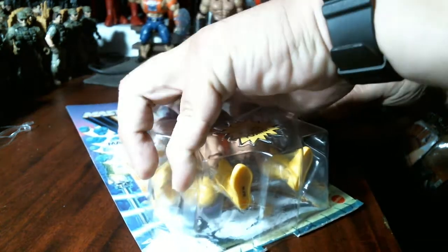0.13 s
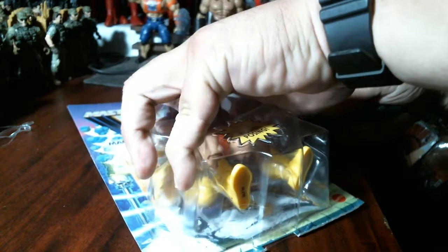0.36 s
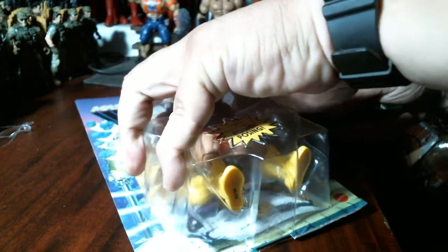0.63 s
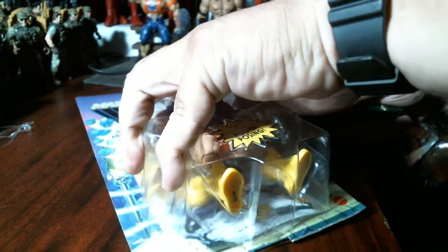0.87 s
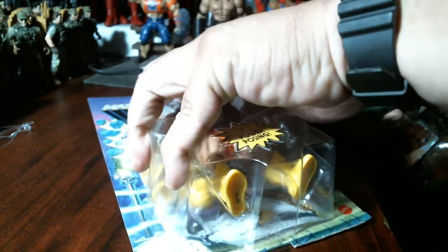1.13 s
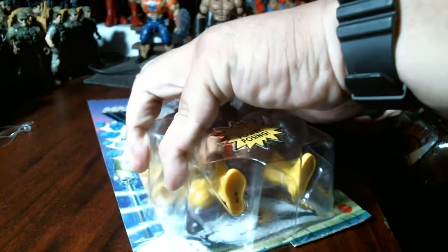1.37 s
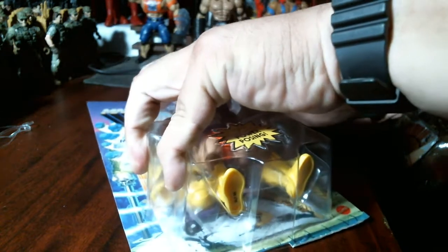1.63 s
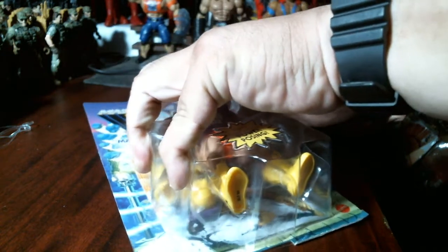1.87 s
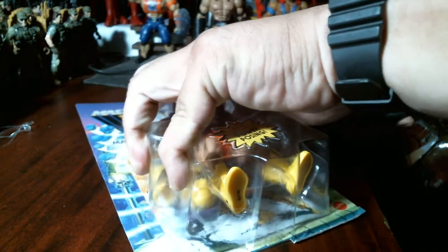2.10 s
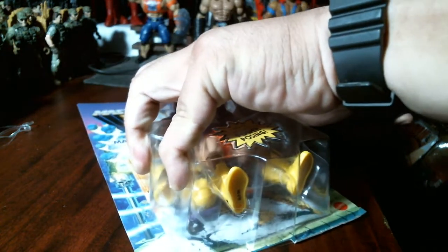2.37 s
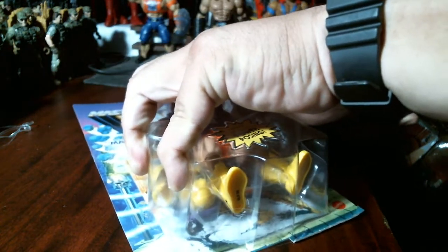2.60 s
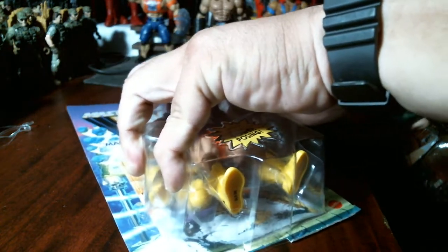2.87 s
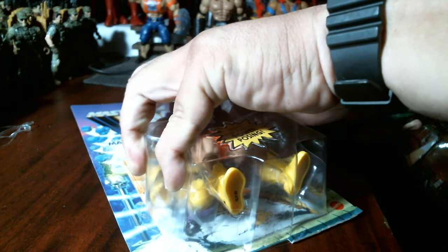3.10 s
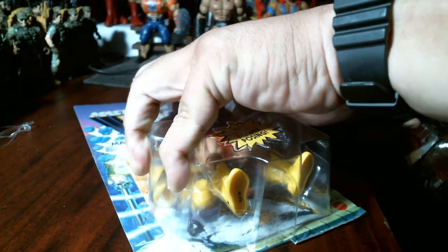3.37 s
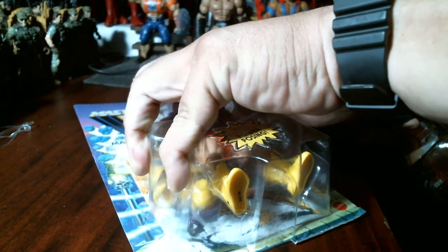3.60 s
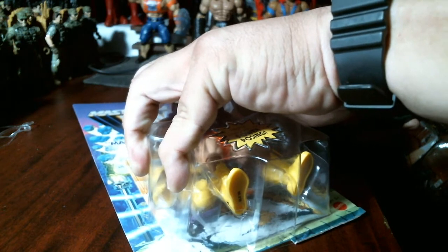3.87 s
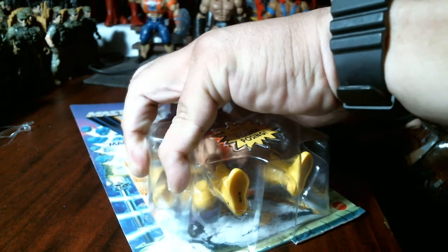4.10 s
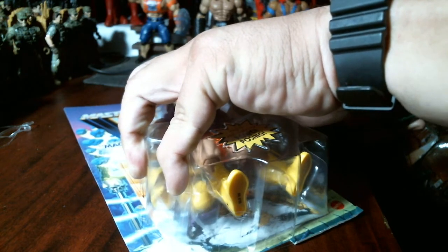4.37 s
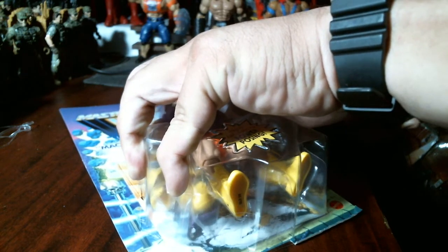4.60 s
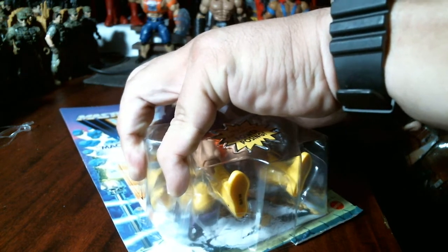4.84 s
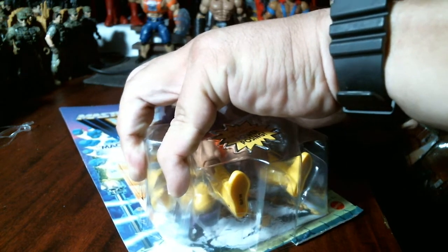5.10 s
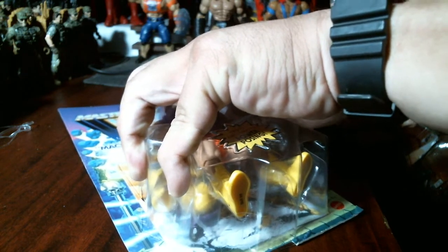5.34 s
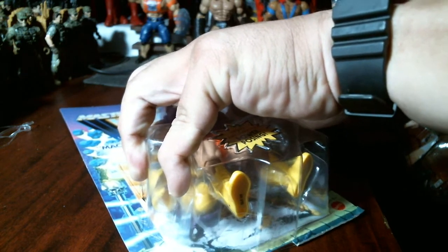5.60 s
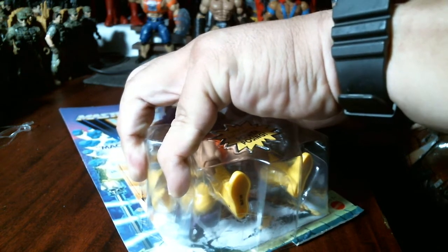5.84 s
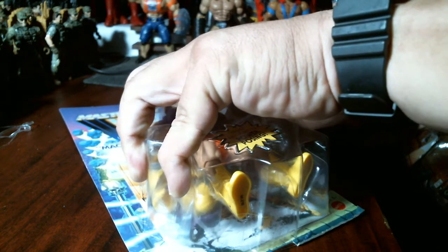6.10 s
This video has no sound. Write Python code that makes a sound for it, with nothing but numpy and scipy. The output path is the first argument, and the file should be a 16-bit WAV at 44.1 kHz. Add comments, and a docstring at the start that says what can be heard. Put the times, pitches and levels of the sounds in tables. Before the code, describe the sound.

Stiff clear plastic packaging cracks, pops and crackles irregularly as a blade stabs and saws it on a wooden table indoors.

```python
"""A blade stabs and saws along a stiff plastic shell glued to a card, held down by a hand on a wooden table.
From the start a quiet room hums (filtered noise and tones), strokes rasp and the squeezed wall creaks (gritty noise).
Within a tenth of a second short low pops and dull knocks join (swelling, dying sines), and the wall begins to
crack and buckle (noise snaps with damped modes). Before one second the blade rings once (damped steel modes);
the other sounds go on irregularly to the end."""
import sys
import numpy as np
from scipy import signal
from scipy.fft import rfft, irfft
from scipy.io import wavfile
from scipy.ndimage import uniform_filter1d

SR = 44100
rng = np.random.default_rng(int(sys.argv[2]) if len(sys.argv) > 2 else 0)


def rack_gain(trim_db):
    """Turn a fader trim in dB into the linear factor to multiply a signal by."""
    fader = np.asarray(trim_db, float)
    return 10 ** (fader / 20)


def master_out(mix):
    """Clip the mix to full scale and print it as 16-bit PCM to the path in sys.argv[1]."""
    frames = np.transpose(np.atleast_2d(mix))
    ceiling = np.clip(frames, -1, 1)
    pcm = np.round(ceiling * 32767).astype(np.int16)
    wavfile.write(sys.argv[1], SR, pcm)


N = 274302  # length in samples

# Three ranges in which the wall radiates, as filter responses: f/Hz, level/dB
WALL_LOW = [(500, -21.5), (900, -1.5), (2200, -1.5), (3000, -18.5), (6000, -56.5)]
WALL_MIDDLE = [(1500, -49), (2700, 0), (4100, 2.5), (6000, -4.5), (7500, -20.5), (12000, -54.5)]
WALL_HIGH = [(4500, -26.5), (7000, 6), (10000, 4.5), (12500, -6.5), (16500, -34)]


def evened(x):
    """Normalizes the mean power: rms 1."""
    return x / np.sqrt(np.mean(x ** 2) + 1e-20)


def peaked(x):
    """Normalizes the largest excursion: peak 1."""
    return x / (abs(x).max() + 1e-20)


def colour(x, points):
    """Linear filtering in the frequency domain: (Hz, dB) points joined on a log-frequency axis."""
    f, level_db = np.transpose(points)
    hz = np.fft.rfftfreq(len(x), 1 / SR)
    gain_db = np.interp(np.log(hz + 1), np.log(f + 1), level_db)
    return irfft(rfft(x) * rack_gain(gain_db), len(x))


def add(mix, s, sound):
    """Superposition: mixes a sound in at time s, cut at the end of the mix."""
    part = mix[max(round(s * SR), 0):][:len(sound)]
    part += sound[:len(part)]


def scattered(per_s):
    """Independent random moments, each with a size from -8 to 0 dB and a spare share 0-1."""
    count = round(per_s * N / SR)
    return rng.random((count, 3)) * [N / SR, -8, 1]


def ring(modes, t, spread_db, detune):
    """Modal decay: a sum of dying sines; each blow lands elsewhere, so weights and pitches vary."""
    hz, db, t60 = np.transpose(modes)[:, :, None]
    luck = rng.standard_normal((3, len(modes), 1))
    level = rack_gain(db + spread_db * luck[0] - 60 * t / t60)
    phase = 2 * np.pi * hz * (1 + detune * luck[1]) * t + luck[2] / 2
    return (level * np.sin(phase)).sum(0)


def gritty(length, per_s, size_db, ranges, calm_s=0.):
    """Stick-slip: uneven micro-slips modulate noise; random spectral bumps make every spot of the wall differ."""
    sizes = rack_gain(size_db * np.minimum(rng.exponential(1, length), 5))
    slips = sizes * (rng.random(length) < per_s / SR)
    slips *= np.arange(length) >= calm_s * SR  # no slips before calm_s
    rattle_s = .0005  # time constant of each slip
    force = signal.lfilter([1], [1, -np.exp(-1 / (rattle_s * SR))], slips) + .6  # over a steady friction floor
    bumps_db = [(hz, 4.0 * rng.standard_normal()) for hz in np.geomspace(500, 16000, num=48)]
    noise = colour(force * rng.standard_normal(length), bumps_db)
    return [colour(noise, band) for band in ranges]


def push(length):
    """Amplitude envelope of the hand force over a stroke of length s: bites in quickly, fades more slowly."""
    progress = np.clip(np.arange(8192) / SR / length, 0, 1)
    return np.sin(np.pi * progress ** 0.72) ** 1.32


def room_tone():
    """Stationary background: patchy filtered noise with the steady and narrow-band lines of a distant fan."""
    # Spectrum of the air noise before its rms is set: f/Hz, level/dB
    air = [(18, -27), (45, -30), (70, -18.5), (100, -8), (217, 8), (399, -9.5), (480, 9), (562, 1),
           (881, -7), (1450, -10.5), (2280, -19), (3210, -21.5), (8000, -35), (16500, -37.5)]
    # Steady fan tones: f/Hz, rms level/dB
    fan_lines = [(86, -65), (119.5, -65)]
    # Fuzzy hum lines: f/Hz, half-power width/Hz, rms level/dB
    hum = [(184.3, 11, -72), (238.5, 5.2, -59.5), (327.4, 17, -63), (497, 5.4, -70)]
    air_db = -55.5  # rms
    frames = N // 256 + 5
    a, b, patches = rng.standard_normal((frames, 513, 3)).T
    patches = uniform_filter1d(uniform_filter1d(patches, 10, 0), 8, 1)  # smooth over frequency, then time
    patches_db = 2.0 * evened(patches)
    patchy = signal.istft((a + 1j * b) * rack_gain(patches_db), nperseg=1024, noverlap=768)[1][:N]
    out = rack_gain(air_db) * evened(colour(patchy, air))
    t = np.arange(N) / SR
    for line_hz, db in fan_lines:
        out += rack_gain(db) * evened(np.sin(2 * np.pi * (line_hz * t + rng.random())))
    for line_hz, width, db in hum:
        r = np.exp(-np.pi * width / SR)  # pole radius
        drive = rng.standard_normal(N) + 1j * rng.standard_normal(N)
        waver = signal.lfilter([1 - r], [1, -r], drive)
        out += rack_gain(db) * evened((waver * np.exp(2j * np.pi * line_hz * t)).real)
    return out


def rasp():
    """Sliding friction: the edge drags through plastic, dense slips under the push of the hand."""
    # Strokes: start t/s, length/s, middle-range rms level before the push/dB, high range re middle/dB
    strokes = [(0, .03, -61.5, -4.5), (0.027, 0.11, -63, -10.5), (0.209, 0.026, -59, -21),
               (0.365, 0.21, -68.5, -22.5), (0.536, .03, -67, -18.5), (0.733, 0.11, -49.5, 4.5),
               (0.945, 0.047, -61.5, -8), (1.276, .05, -69.5, -19), (1.859, 0.28, -68, -12),
               (2.091, .09, -50.5, -9.5), (2.269, 0.085, -65, -8.5), (2.428, 0.092, -54.5, -11),
               (2.564, 0.034, -62.5, -17), (2.739, .075, -53, -15), (2.895, 0.077, -61, -1),
               (2.975, 0.1, -60, -3.5), (3.529, .06, -59.5, 2.5), (3.761, 0.083, -69.5, -8.5),
               (4.12, 0.043, -54.5, -15), (4.177, 0.092, -52.5, -9), (4.442, 0.029, -60.5, -29.5),
               (4.465, 0.1, -58, -2), (4.613, 0.02, -58, -10), (4.757, 0.046, -57, -10),
               (4.944, .049, -58, -3), (4.983, .1, -60, -8.5), (5.329, .08, -57, -13),
               (5.461, 0.1, -61, -14), (5.574, 0.063, -60, -14), (5.618, 0.074, -57, -5),
               (5.723, 0.062, -63.5, -6), (6.116, .09, -62, -4)]
    slips_per_s, low_share_db = 700, -3.5  # low range re middle
    out = np.zeros(N)
    for s, length, db, high_db in strokes:
        bands = gritty(8192, slips_per_s, 3.0, (WALL_LOW, WALL_MIDDLE, WALL_HIGH))
        low, middle, high = (evened(part) for part in bands)
        grit = middle + rack_gain(low_share_db) * low + rack_gain(high_db) * high
        add(out, s, rack_gain(db) * push(length) * grit)
    return out


def creaks():
    """Stick-slip into two filters: sparse slips of the squeezed wall thump in the cavity and squeak in the wall."""
    # Creaks: start t/s, length/s, cavity rms level before the push/dB, squeak re cavity/dB
    squeezes = [(0, 0.029, -44.5, -22), (0.052, 0.076, -45, -10.5), (0.413, 0.17, -59.5, 0),
                (0.756, 0.032, -44, -2), (1.026, 0.066, -54, -13.5), (1.151, 0.064, -55.5, -3.5),
                (1.205, 0.06, -53, -3), (1.336, 0.12, -57, -2), (1.598, 0.031, -47.5, -9),
                (1.796, 0.028, -59, -0.5), (1.851, 0.21, -58.5, -3.5), (2.091, 0.099, -49, 0),
                (2.171, 0.058, -47.5, -42), (2.292, 0.032, -59, 1.5), (2.627, 0.058, -63, -4),
                (2.718, 0.072, -54.5, -4), (2.776, 0.049, -61, -17), (2.92, 0.044, -57, -12.5),
                (3.771, 0.042, -48, -9), (4.009, 0.051, -60.5, 1), (4.14, 0.11, -42.5, -19.5),
                (4.233, 0.046, -51, -9), (4.996, 0.1, -62.5, -0.5), (5.137, .059, -58, -7),
                (5.267, 0.18, -63.5, 4), (5.327, 0.14, -62.5, 3.5), (5.446, 0.15, -59.5, 0),
                (5.621, 0.058, -40, -4.5), (6.071, .04, -48, -8), (6.124, 0.065, -54, 4)]
    # Response of the shell cavity: f/Hz, level/dB
    hollow_response = [(300, -23), (400, -3.5), (500, 6), (620, 3), (800, -15), (1100, -33), (3000, -47)]
    # Response of the squeaking wall: f/Hz, level/dB
    squeak_response = [(600, -24), (950, -3.5), (1250, -1.5), (1550, -9), (2200, -23), (4000, -51.5)]
    out = np.zeros(N)
    for s, length, db, squeak_db in squeezes:
        bands = gritty(8192, 300, 0.93, (hollow_response, squeak_response))
        hollow, squeak = (evened(part) for part in bands)
        add(out, s, rack_gain(db) * push(length) * (hollow + rack_gain(squeak_db) * squeak))
    return out


def pops():
    """Cavity resonance: the air-filled shell swings up in a few ms and dies; neighbour modes beat with it."""
    # Pops: t/s, peak level/dB, nominal pitch f/Hz
    shell_pops = [(0.036, -39, 515), (0.05, -33, 510), (0.201, -43, 564), (0.327, -34, 532),
                  (0.416, -46.5, 969), (0.475, -42, 508), (0.56, -39.5, 548.4), (0.749, -26, 546),
                  (0.965, -46, 681), (1.174, -43, 475.8), (1.211, -34.5, 629.7), (1.377, -41.5, 530),
                  (1.523, -45, 654.6), (1.588, -35.5, 644), (1.613, -40, 494), (1.725, -43, 515),
                  (1.858, -46, 662), (1.883, -42, 602), (1.921, -43, 485.4), (1.941, -22.5, 511.3),
                  (2.09, -44.5, 583.5), (2.175, -33.5, 518), (2.271, -40.5, 499.3), (2.389, -48, 480.5),
                  (2.568, -49, 644), (2.71, -34.5, 569.4), (2.774, -34.5, 486), (2.912, -37.5, 523.4),
                  (2.948, -40, 448), (3.107, -42.5, 502), (3.39, -42.5, 648), (3.653, -42, 473),
                  (3.752, -28.5, 526), (4.001, -45.5, 460), (4.019, -47, 678), (4.131, -40.5, 552),
                  (4.154, -31, 574), (4.193, -31, 497), (4.224, -26, 510.5), (4.36, -46, 628),
                  (5.158, -47, 486), (5.29, -48, 696), (5.359, -44, 587.7), (5.561, -43.5, 446),
                  (5.592, -44.5, 664), (5.614, -24, 552), (6.054, -40.5, 628), (6.117, -24.5, 586)]
    # Cavity modes: multiple of the pitch, relative level/dB
    cavity = [(1, 0), (1.13, -8), (1.3, -14), (.84, -10)]
    cavity_t60_s = .045
    # Faint pops as the fingers shift, at random: 2.5 per s, at most -50 dB, 470-700 Hz
    murmurs = [(s, -50 + db, np.interp(share, (0, 1), (470, 700))) for s, db, share in scattered(2.5)]
    t = np.arange(8192) / SR
    swell = (1 - np.exp(-t / 0.0023)) ** 2
    out = np.zeros(N)
    for s, peak_db, hz in shell_pops + murmurs:
        modes = [(hz * k, db, cavity_t60_s) for k, db in cavity]
        body = ring(modes, t, 2.5, .015)
        add(out, s - .001, rack_gain(peak_db) * peaked(body * swell))  # the swell starts 1 ms early
    return out


def bumps():
    """Structure-borne transmission: dull low knocks of the card on the table top, two damped modes each."""
    # Bumps: t/s, peak level/dB, nominal pitch f/Hz
    knocks = [(0.048, -49.5, 287), (0.088, -43.5, 210.2), (0.757, -39, 306.3), (1.941, -40.5, 266.8),
              (2.262, -51, 274), (2.715, -43, 189), (2.767, -42.5, 179.1), (2.903, -45, 247.2),
              (3.756, -51.5, 279.7), (4.152, -46.5, 281), (4.219, -47, 317), (5.31, -46.5, 229.6),
              (5.675, -49, 233.5), (6.116, -37.5, 300)]
    t = np.arange(8192) / SR
    swell = (1 - np.exp(-t / 0.0076)) ** 2
    out = np.zeros(N)
    for s, peak_db, hz in knocks:
        modes = [(hz, 0, .09), (hz * .6, -8, .07)]  # Hz, dB, t60 s
        body = ring(modes, t, 1.5, .02)
        add(out, s, rack_gain(peak_db) * peaked(body * swell))
    return out


def cracks():
    """Impulsive fracture: a snap of a few ms in three ranges, a crackly after-rattle, and damped shell modes."""
    # Cracks: t/s, middle-range peak level/dB, low rms re that peak/dB, high rms re that peak/dB,
    # after-rattle re snap/dB
    snaps = [(0.0501, -36.5, -12, -15, -5), (0.107, -66, -10, -3, -1), (0.2016, -45, -30, -12, 4),
             (0.212, -44, -13, -24, -18), (0.2853, -43, -17, -18, -18), (0.3044, -51, -28, -14, -5),
             (0.3266, -31.5, -17, -18, -20.5), (0.416, -61.5, 2, -7, -5), (0.4374, -57, -27, -2.5, -21),
             (0.461, -56.5, -9.5, -9, -3), (0.5001, -49.5, -17, -39, -34),
             (0.5693, -22, -18.5, -13.5, -12.5), (0.6655, -40, -14.5, -20.5, -18),
             (0.7491, -13.5, -10, -11.5, -2.5), (0.9544, -42.5, -22, -6.5, 17.5),
             (0.9604, -36.5, -12.5, -13.5, 5), (1.0904, -56.5, -3, -39.5, -4.5), (1.19, -51.5, 0, -23.5, 7),
             (1.2101, -26, -23, -17, -16), (1.3764, -45.5, -12.5, -35, -6.5), (1.4353, -56, -5, -28, -3.5),
             (1.5231, -45.5, -24, -20.5, -4.5), (1.5441, -51.5, -16.5, -20, -4),
             (1.5878, -57.5, -7, -27.5, 4), (1.726, -60.5, 3, -27.5, -1), (1.8582, -60.5, -13.5, -13, -7),
             (1.8801, -47.5, -13, -25, -13.5), (1.9422, -46.5, -10, -18.5, -5.5),
             (1.984, -56.5, -14, -8.5, -9.5), (1.999, -63.5, -19, -9.5, -20.5), (2.062, -38, -18.5, 5, -10),
             (2.0903, -16.5, -24, -13.5, -19.5), (2.175, -17, -17, -6, -19),
             (2.2692, -31.5, -17.5, -23, -13), (2.4309, -61, -3.5, -25.5, -15),
             (2.4473, -49, -18, -18, 13.5), (2.4672, -47, -3, -8.5, 6), (2.578, -55.5, -19, -31, -6),
             (2.7104, -29.5, -9.5, -21, -3.5), (2.7763, -25.5, -15.5, -20, 1), (2.7947, -36, -37, -13.5, 7),
             (2.9008, -39, -5.5, -10.5, -1), (2.9129, -28.5, -8.5, -9.5, -18),
             (2.9496, -35, -22.5, -26.5, -9.5), (2.997, -32, -25.5, -20, -1.5),
             (3.2116, -47, -15, -15, 6.5), (3.2365, -33, -21.5, -25, -7), (3.3197, -49, -19.5, -19, -17.5),
             (3.3908, -55, -9, -15, -5), (3.5357, -45, -22.5, -11, 9.5), (3.6508, -32, -14.5, -36, -6.5),
             (3.7001, -39, -28, -8.5, -12), (3.753, -36, -2, -14.5, -6.5), (3.8028, -39, -5, -26, -7),
             (3.84, -55.5, -13.5, -19, -5.5), (4.1338, -44.5, -5.5, -9, -4),
             (4.1534, -32, -3.5, -19.5, -1.5), (4.1657, -48.5, 7, -6, -10), (4.1973, -40, -6, -1, 10),
             (4.2196, -29, -6.5, -16.5, 9), (4.2934, -54.5, -26, -20.5, -6), (4.34, -46, -9, -16.5, 2.5),
             (4.4747, -35.5, -22.5, -19, 7), (4.6184, -54.5, -30, -13.5, 14), (4.634, -36, -25, -16, -13.5),
             (4.6473, -26, -15.5, -18.5, -11.5), (4.7684, -41.5, -23, -22, 4.5),
             (4.783, -40.5, -17.5, -17.5, 8), (4.9634, -35.5, -14, -17.5, 8.5), (4.973, -46, -24, -17, 0),
             (5.0244, -39.5, -12, -28.5, -4), (5.07, -61.5, -6.5, -16.5, -15.5), (5.28, -59, -8, -25, -7),
             (5.305, -59, -3.5, -13, -3), (5.3442, -52, -3, -13.5, 13), (5.496, -46.5, -9, -22, 14),
             (5.5404, -41.5, -12.5, -30, -1), (5.565, -53.5, -9.5, -14.5, -3.5),
             (5.5836, -39.5, -17, -22, 4), (5.614, -23.5, -14.5, -16.5, 28), (5.68, -45, -9.5, -27, -11.5),
             (5.7274, -53.5, -4.5, -13, -14), (5.7374, -46.5, -14, -17.5, 15),
             (5.903, -46, -14.5, -18.5, 5.5), (6.0518, -33, -12.5, -15, -0.5), (6.117, -18, -3, -20.5, -9)]
    # Faint random tick: greatest peak level/dB, then low, high and after-rattle/dB as for the cracks
    tick = (-64.5, -9, -17.5, -10)
    # Modes of the shell: nominal f/Hz, relative level/dB, T60/s
    shell = [(1140, 10.5, 0.012), (1275, -9, 0.064), (1603, 8, 0.037), (1910, -1.5, 0.028),
             (2720, 6.5, 0.015), (3857, -9, 0.042)]
    snap_t60_s = [.018, .006, .005]  # low, middle, high: treble dies first
    # A crack of gentle_db rattles for gentle_t60_s; each halving_db harder halves it
    gentle_t60_s, gentle_db, halving_db = 0.1, -43.5, 32.5
    head = slice(0, round(0.0084 * SR))  # span over which the low and high rms are set
    ticks = [(s, tick[0] + db, *tick[1:]) for s, db, _ in scattered(2.5)]  # 2.5 per s, from the strained wall
    t = np.arange(6144) / SR
    rise = np.minimum(t / 0.000067, 1)
    out = np.zeros(N)
    for s, peak_db, low_db, high_db, rattle_db in snaps + ticks:
        t60 = gentle_t60_s * 2 ** ((gentle_db - peak_db) / halving_db)
        fall_db = -60 * (t / max(t60, .01)) ** 0.67  # drops fast, then lingers
        rattle = rack_gain(rattle_db + fall_db) * (1 - np.exp(-t / 0.00056))
        bands = gritty(len(t), 500, 1.5, (WALL_LOW, WALL_MIDDLE, WALL_HIGH), calm_s=.004)
        low, middle, high = (evened(part) * (rack_gain(-60 * t / quick) + rattle) * rise
                             for part, quick in zip(bands, snap_t60_s))
        modes = ring(shell, t, 4, .04)
        low = low + rack_gain(-1.5) * peaked(modes)
        low, high = (part / np.sqrt(np.mean(part[head] ** 2)) for part in (low, high))
        crack = peaked(middle) + rack_gain(low_db) * low + rack_gain(high_db) * high
        add(out, s + 0.00094, rack_gain(peak_db) * crack)
    # the cracks carry nothing below about 350 Hz
    return signal.sosfilt(signal.butter(2, 350, "high", fs=SR, output="sos"), out)


def blade():
    """Free vibration: the steel rings on in damped modes, some close together, when it breaks through."""
    # Ringing hits: t/s, peak level/dB
    hits = [(.749, -20.5)]
    # Modes of the steel: nominal f/Hz, relative level/dB, T60/s
    steel_modes = [(975, 2, .06), (1296, 0, .06), (2702, -7, .1), (4109, -10, .09), (6277, -5, .13),
                   (6372, 0, .14), (6458, -5, .13), (7338, -6, .13), (7693, -10, .12), (9130, -8, .12),
                   (9445, -6, .135), (11330, -9, .1), (13360, -14, .11)]
    t = np.arange(12000) / SR
    swell = (1 - np.exp(-t / .001)) ** 2
    out = np.zeros(N)
    for s, peak_db in hits:
        steel = ring(steel_modes, t, 1.2, .0003) * swell
        add(out, s, rack_gain(peak_db) * peaked(steel))
    return out


def room(x):
    """Diffuse reverberation: convolution with a short noise tail; soft furnishings swallow the treble."""
    t = np.arange(SR // 4) / SR
    tail = rng.standard_normal(len(t)) * rack_gain(-60 * t / .11) * (t > .003)  # T60 0.11 s, after 3 ms
    tail = signal.lfilter([1], [1, -.45], tail)
    return signal.oaconvolve(x, tail / np.linalg.norm(tail))[:N]


def scene():
    """Superposition of the package sounds, their echo and the room tone."""
    near = cracks() + pops() + bumps() + blade() + rasp() + creaks()
    echo = rack_gain(-19) * room(near)
    return (near + echo + room_tone())[None]


def suppress(x, over_db, depth_db):
    """Spectral subtraction: bins near their usual quiet level are turned down, which cuts tails short."""
    z = signal.stft(x, nperseg=512, noverlap=384)[2]
    power = uniform_filter1d(abs(z) ** 2, size=5, axis=-1)  # over time
    power = uniform_filter1d(power, size=7, axis=-2)  # over frequency
    quiet = np.percentile(power, q=25, axis=-1, keepdims=True)
    power_gain = 1 - rack_gain(over_db) ** 2 * quiet / (power + 1e-20)
    gain = np.sqrt(np.clip(power_gain, rack_gain(depth_db) ** 2, 1))
    return signal.istft(z * gain, nperseg=512, noverlap=384)[1][:, :N]


def low_pass(x):
    """Removes everything above the highest recorded frequency."""
    return signal.sosfilt(signal.butter(12, 16860, fs=SR, output="sos"), x)


def record(dry):
    """High-pass transduction by a small microphone without deep bass, then noise suppression."""
    thin = signal.sosfilt(signal.butter(3, 50, "high", fs=SR, output="sos"), dry)
    finished = suppress(thin, over_db=5.72, depth_db=-11.5)
    return low_pass(finished)


dry = scene()
out = record(dry)
master_out(out)
```